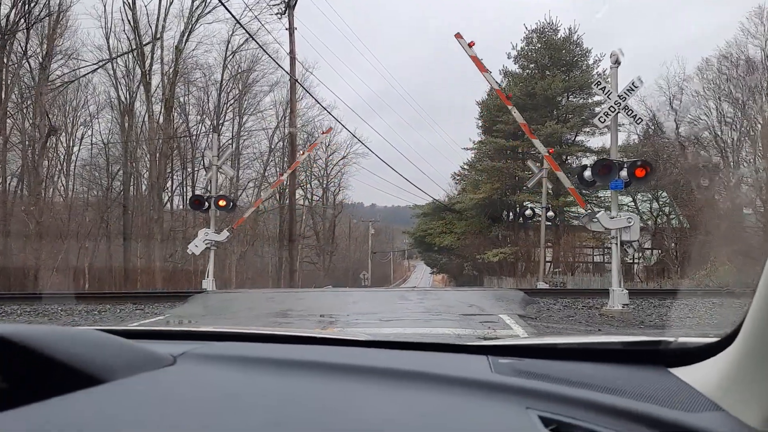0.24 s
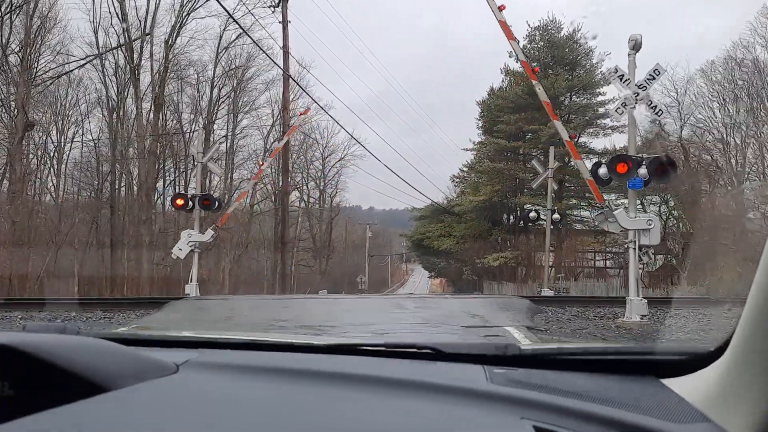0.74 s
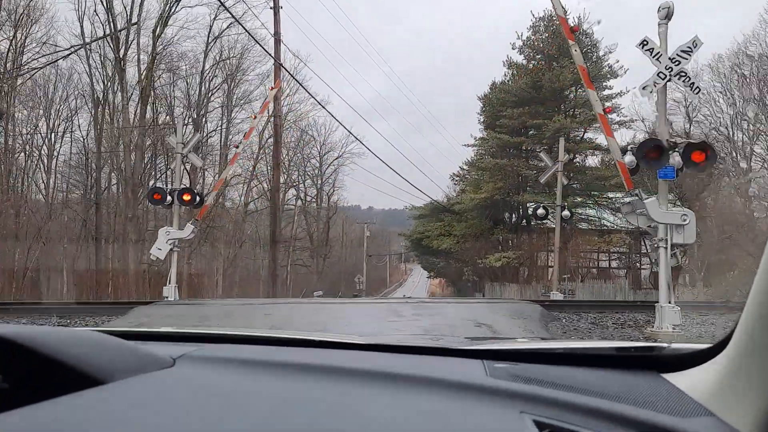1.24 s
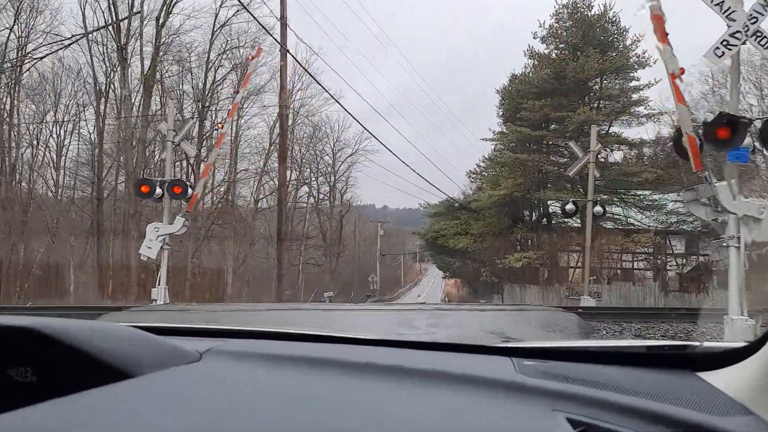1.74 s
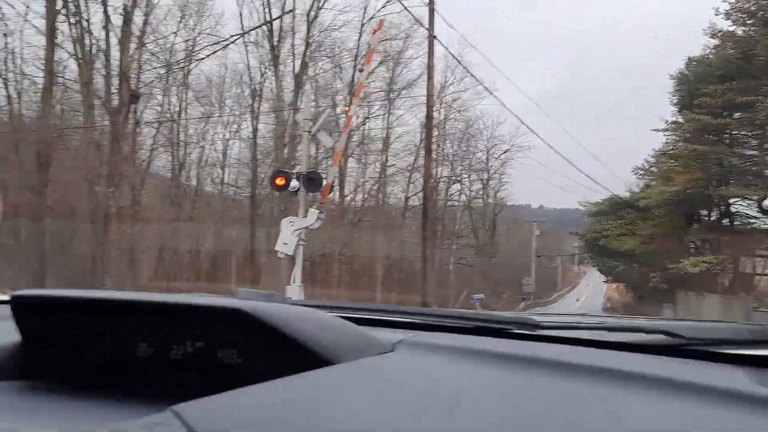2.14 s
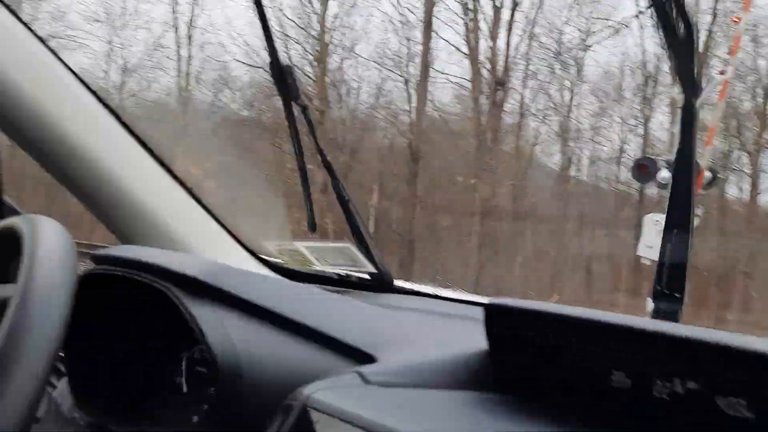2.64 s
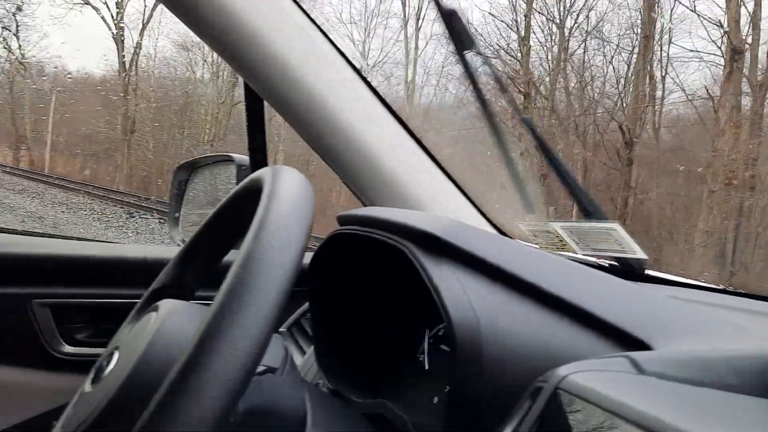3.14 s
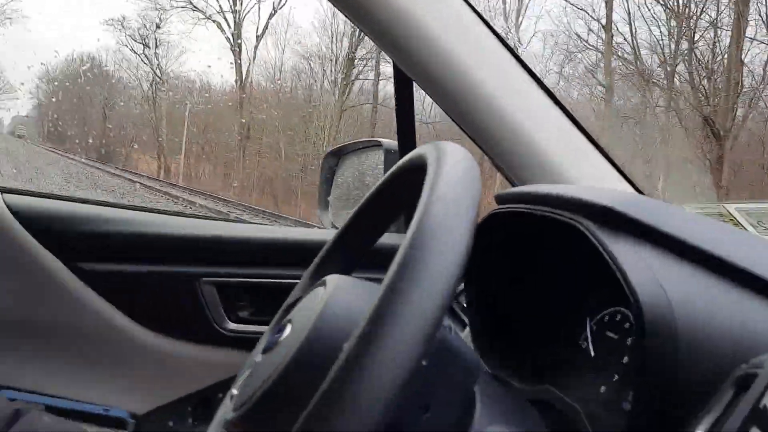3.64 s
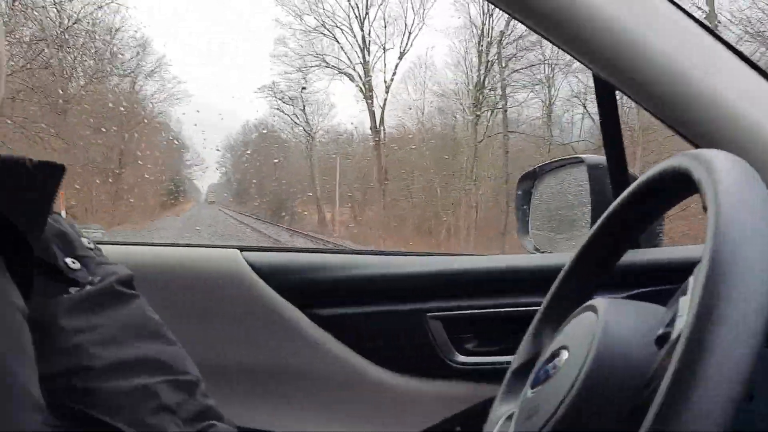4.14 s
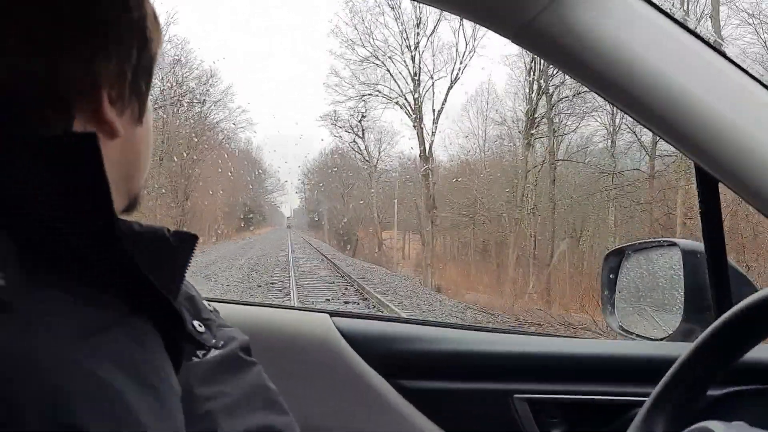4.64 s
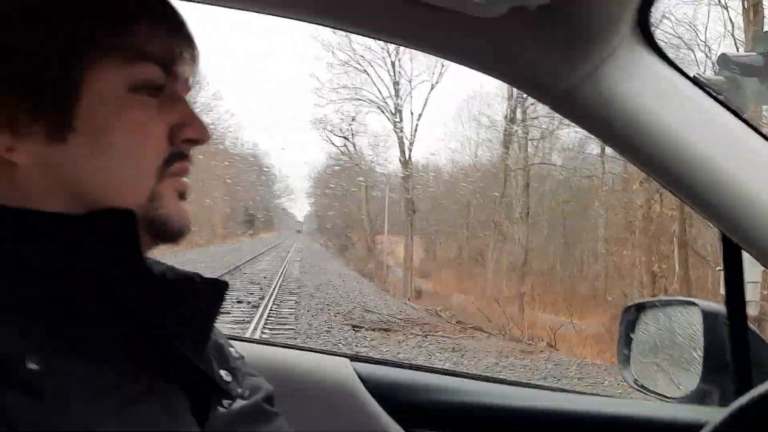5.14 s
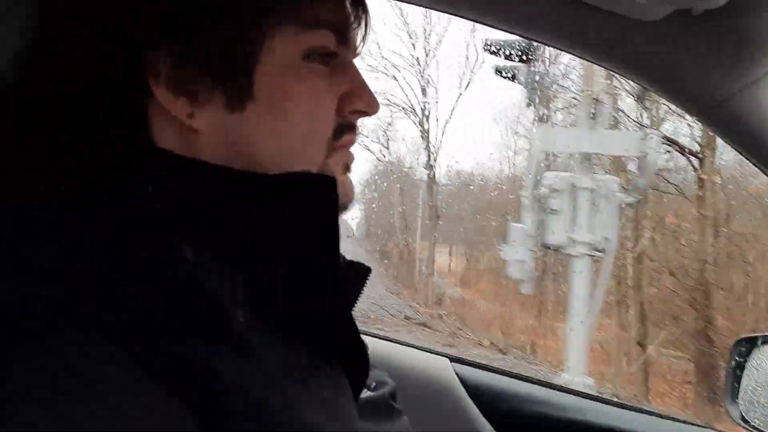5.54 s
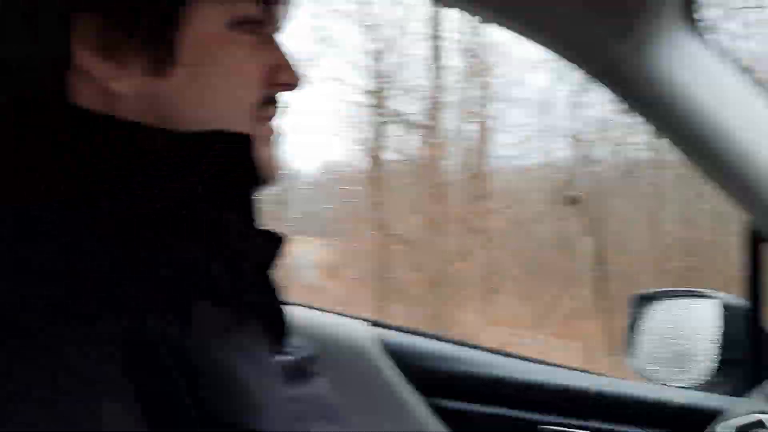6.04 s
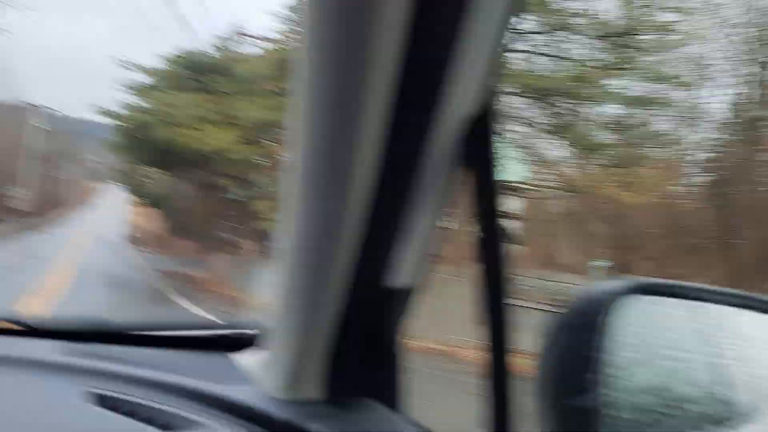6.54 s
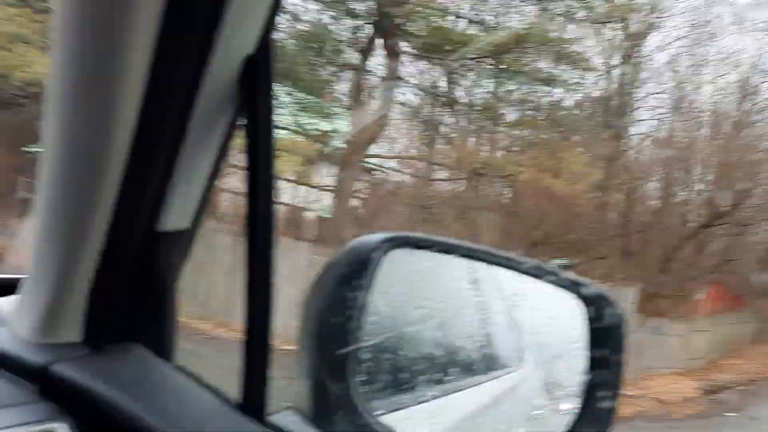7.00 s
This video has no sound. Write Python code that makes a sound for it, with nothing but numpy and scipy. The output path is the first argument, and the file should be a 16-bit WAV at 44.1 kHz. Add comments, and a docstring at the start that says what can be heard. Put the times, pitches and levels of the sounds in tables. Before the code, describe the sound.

Inside a car rolling slowly over a railroad crossing on wet road: low engine hum, rumble, bumps, tyre hiss, then buffeting wind on the left.

```python
"""Inside a car that rolls slowly over a railroad crossing on a wet road.
First an engine hum of steady firing orders over noisy road rumble and faint hiss, with short booms at the bumps.
A wiper swishes, a small motor whines, and the hiss of filtered noise grows; then plastic trim ticks.
From the middle, gusts of noise buffet the left microphone opening, with hollow pops and surges of airy hiss.
Near the end the hardest gusts thump, as ringing low tones on the left."""
import sys
import numpy as np
from scipy import signal
from scipy.fft import rfft, irfft
from scipy.io import wavfile
from scipy.ndimage import map_coordinates

SR = 44100
rng = np.random.default_rng(int(sys.argv[2]) if len(sys.argv) > 2 else 0)


def to_wav(sig):
    """Store sig (one row per channel, or 1-D mono) as 16-bit WAV at the path in sys.argv[1].

    Samples outside -1..1 are clipped; the rate is SR.
    """
    pcm = np.clip(np.atleast_2d(sig), -1, 1) * 32767
    pcm = np.round(pcm).astype(np.int16)
    wavfile.write(sys.argv[1], SR, pcm.T)  # frames by channels


N = 320537
TIME = np.arange(N) / SR  # seconds
HZ = np.fft.rfftfreq(N, 1 / SR)


def gain_of(db):
    """Turns decibels into an amplitude factor."""
    return 10 ** (np.asarray(db) / 20)


def evened(x):
    """Scales to an rms of 1."""
    return x / np.sqrt(np.mean(x ** 2) + 1e-20)


def read_spectrum(points):
    """Reads a table of pitches and values along the whole frequency axis."""
    hz, value = np.transpose(points)
    return np.interp(np.log(HZ + 1), np.log(hz), value)


def follow(rows):
    """Draws straight lines through each column of a time table."""
    s, *columns = np.transpose(rows)
    return [np.interp(TIME, s, column) for column in columns]


def drift(rate_hz):
    """Random wandering with an rms of 1, mostly slower than the given rate."""
    slowed = rfft(rng.standard_normal(N)) / (1 + (HZ / rate_hz) ** 4)
    return evened(irfft(slowed, N))


def swell(s, length, squareness=2, skew=0):
    """A bell at least half as strong in power for the given length; positive skew rises faster than it falls."""
    stretched = length * (1 + np.clip(skew, -.8, .8) * np.sign(TIME - s))
    distance = np.minimum(abs(2 * (TIME - s) / stretched), 10)
    return np.exp(-np.log(2) / 2 * distance ** squareness)


def noise(spectrum):
    """Coloured noise for one side, with an rms of 1."""
    return evened(irfft(rfft(rng.standard_normal(N)) * gain_of(read_spectrum(spectrum)), N))


# How alike noise in the cabin is on both sides: pitch_hz, likeness (0 to 1)
SIDE_LIKENESS = [(60, 0.93), (130, 0.93), (290, 0.82), (640, 0.49), (1300, 0), (16000, 0)]
# How cabin noise leans to one side: pitch_hz, left_minus_right_db
SIDE_LEAN = [(60, -0.5), (200, -2.5), (380, -2), (1290, -3), (2400, 1), (4400, 1.2), (6300, 1.5),
             (9500, 1.5), (13000, 2.5)]


def cabin_noise(spectrum):
    """Noise from all around: alike on both sides in the bass, unrelated in the treble; rms 1 on the right."""
    a, b = rfft(rng.standard_normal((2, N))) * gain_of(read_spectrum(spectrum))
    same = np.clip(read_spectrum(SIDE_LIKENESS), -1, 1)
    left = (same * a + np.sqrt(1 - same ** 2) * b) * gain_of(read_spectrum(SIDE_LEAN))
    pair = irfft(np.array([left, a]), N)
    return pair / pair[1].std()


def placed(x, lean_db):
    """Sets a sound to the left (above 0) or right (below 0)."""
    return x * gain_of([[lean_db / 2], [-lean_db / 2]])


def add(mix, s, sound):
    """Mixes a stereo sound in at time s."""
    part = mix[:, round(s * SR):][:, :sound.shape[1]]
    part += sound[:, :part.shape[1]]


def burst(spectrum, t60, tilt_db=0, size=8192):
    """A short burst of coloured noise that dies away, scattered differently to each side."""
    t, hz = np.arange(size) / SR, np.fft.rfftfreq(size, 1 / SR)
    colour_db = np.interp(hz, HZ, read_spectrum(spectrum)) + tilt_db * np.log2(hz + 200)
    scatter = evened(irfft(rfft(rng.standard_normal((2, size))) * gain_of(colour_db), size))
    return scatter * gain_of(-60 * t / t60) * (1 - np.exp(-t / 0.00071))


# The engine's course: start_s, firing_rate_hz, level_db
ENGINE_COURSE = [(0, 53.23, -34.5), (1.1, 50.5, -32.5), (2.3, 49.44, -33), (3.2, 40.08, -38.5),
                 (4, 40.02, -30.5), (5, 42.2, -38.5), (7.27, 39.25, -53)]
# Tones of the hum: multiple of the firing rate, strength_db before unsteadiness and fading
ENGINE_ORDERS = [(1, -2.5), (2, -1), (3, -6), (4, -17.5), (6, -16.5), (7, -17)]


def engine():
    """Low firing orders, each slightly unsteady; those above the second fade as the revs drop."""
    hz, db = follow(ENGINE_COURSE)
    turns = np.cumsum(hz * (1 + 0.01046 * drift(6.48))) / SR
    ease = np.clip((50 - hz) / 10, 0, 1)  # 0 at 50 Hz and above, 1 at 40 Hz and below
    hum = 0
    for multiple, order_db in ENGINE_ORDERS:
        size = gain_of(order_db - 4.9 * ease * (multiple > 2) + 2.0 * drift(15.0))
        hum = hum + size * np.sin(2 * np.pi * (multiple * turns + rng.random()))
    return placed(gain_of(db) * evened(hum), lean_db=-3.5)


# The road's course, before its lumps: start_s, rumble_db, tyre_roar_db
ROAD_COURSE = [(0, -35, -36), (1.2, -28.5, -37), (3.5, -32.5, -37.5), (6.4, -31, -37.5),
               (6.85, -29.5, -34.5), (7.27, -25.5, -31.5)]
# The rough deck of the crossing, one row: middle_s, length_s, rumble_db, tyre_roar_db
CROSSING_DECK = (5, 1.5, -31, -36)
# Colour of the shaken car body: pitch_hz, strength_db (per Hz)
RUMBLE_COLOUR = [(15, -36), (28, -41), (38, -6), (50, -2), (66, -2), (81, 3), (98, -3), (130, -3.5),
                 (160, -8), (210, -26.5), (300, -64), (600, -66.5)]
# Colour of the air in the tyres: pitch_hz, strength_db (per Hz)
ROAR_COLOUR = [(120, 1), (190, -3), (235, -3), (275, 0), (320, 2.5), (380, -1.5), (450, -7), (550, -11.5),
               (740, -18), (1000, -30.5), (1500, -24.5), (4000, -76)]


def road():
    """Rough asphalt shakes the body in uneven lumps and sets the air in the tyres roaring; the deck adds more."""
    rumble_db, roar_db = follow(ROAD_COURSE)
    s, length, deck_rumble_db, deck_roar_db = CROSSING_DECK
    deck = swell(s, length, squareness=24)
    lumps = drift(7)
    rumble = np.hypot(gain_of(rumble_db), gain_of(deck_rumble_db) * deck)
    rumble = rumble * gain_of(2.65 * lumps)
    roar = np.hypot(gain_of(roar_db), gain_of(deck_roar_db) * deck)
    roar = roar * gain_of(1.0 * lumps + 1.44 * drift(30))
    return rumble * cabin_noise(RUMBLE_COLOUR) + roar * cabin_noise(ROAR_COLOUR)


ECHO_NEAREST_S, ECHO_SPREAD_S, ECHO_SWAY_S = 0.000294, .003, .00012
SWAYS_PER_S = 0.197  # typical; each echo sways at half to one and a half times this
ECHO_SHARE = .11  # strength of each echo beside the direct sound


def echoes(x, count=4):
    """Near echoes from glass and dashboard; their paths sway slowly, so hollows wander through the hiss."""
    out = x
    for near, pace, phase in rng.random((count, 3)):
        sway = ECHO_SWAY_S * np.sin(2 * np.pi * (SWAYS_PER_S * (.5 + pace) * TIME + phase))
        delay = ECHO_NEAREST_S + ECHO_SPREAD_S * near ** 2 + sway
        out = out + ECHO_SHARE * map_coordinates(x, [np.arange(N) - delay * SR], order=2)
    return out / np.sqrt(1 + count * ECHO_SHARE ** 2)


# Resonances of the microphone opening (port): multiple of its main pitch, width_hz, strength_db
PORT_RESONANCES = [(.42, 500, -0.5), (1, 650, 1), (2.15, 2200, -5)]
PORT_HZ, PORT_SAG_HZ = 6360, 950  # main pitch in still air, and how far a typical gust lowers it


def port(x, flow, ring_db):
    """Adds the resonances of the microphone opening, which sink in pitch as the air flow grows."""
    turns = np.cumsum(PORT_HZ - PORT_SAG_HZ * flow ** 0.61) / SR
    ring = 0
    for multiple, width_hz, db in PORT_RESONANCES:
        turn = np.exp(2j * np.pi * multiple * turns)
        r = np.exp(-np.pi * width_hz / SR)
        # Shift the resonance down to 0 Hz, smooth there, and shift back up
        smooth = signal.lfilter([1 - r], [1, -r], x / turn)
        ring = ring + gain_of(db) * 2 * (turn * smooth).real
    return 0.68 * (x + gain_of(ring_db) * ring)


# Water under the tyres, before flicker: start_s, spray_db
WET_COURSE = [(0, -71.5), (.5, -63), (1.53, -61.5), (1.78, -47.5), (2.1, -47), (2.62, -43.5), (3.2, -50),
              (3.7, -46.5), (4.7, -48), (7.27, -49.5)]
# Brief surges of airy hiss on both sides: middle_s, length_s, fine_part_db (before its lean), dull_part_db
HISS_SURGES = [(5.34, 0.12, -45, -56), (6.41, 0.4, -42, -41)]
# The left opening is turned away from the spray, one row: middle_s, length_s, share_lost (0 to 1)
LEFT_SHELTER = (5.14, 0.76, 0.79)
# Colour of the dull wash: pitch_hz, strength_db (per Hz)
WASH_COLOUR = [(300, -12), (700, 3.5), (1100, 0), (1550, -0.5), (2200, -5), (2800, -11), (4000, -18.5),
               (6500, -26), (16000, -30)]
# Colour of the fine spray: pitch_hz, strength_db (per Hz)
SPRAY_COLOUR = [(900, -36), (2000, 7), (3000, -0.5), (3900, 2), (5000, -0.5), (6400, -1), (7500, -3.5),
                (9600, -7), (12000, -2.5), (14000, -7), (16000, -9)]
WASH_FLOOR_DB, WASH_OVER_SPRAY_DB = -52.5, -2  # the wash has a steady part and a part that follows the spray
SURGE_LEAN_DB = -6  # the fine part of the surges is stronger on the right


def wet_tyres_and_surges(flow):
    """A dull wash and fine spray, muffled while faint, that sings at the left opening; airy surges swell both."""
    spray_db, = follow(WET_COURSE)
    spray_size = gain_of(spray_db)
    wash_size = np.hypot(gain_of(WASH_FLOOR_DB), gain_of(spray_db + WASH_OVER_SPRAY_DB))
    for s, length, fine_db, dull_db in HISS_SURGES:
        surge = swell(s, length, squareness=2.6)
        spray_size = np.hypot(spray_size, placed(gain_of(fine_db) * surge, SURGE_LEAN_DB))
        wash_size = np.hypot(wash_size, gain_of(dull_db) * surge)
    wash = wash_size * gain_of(1.57 * drift(13.0)) * cabin_noise(WASH_COLOUR)
    spray = spray_size * gain_of(-0.47 + 0.99 * drift(30)) * cabin_noise(SPRAY_COLOUR)

    muffled = irfft(rfft(spray) / (1 + (HZ / 10500) ** 4), N)
    muffling = np.clip((-55.0 - spray_db) / 10, 0, 1)
    spray = spray + muffling * (1.13 * muffled - spray)

    s, length, share = LEFT_SHELTER
    kept = 1 - min(share, 1) * swell(s, length, squareness=3.1)
    left_spray = port(spray[0], flow, ring_db=-2.5) * kept
    return np.array([echoes(wash[0] + left_spray), echoes(wash[1] + spray[1])])


# Jolts of the body: middle_s, length_s (1.3 times the half-power length), pitch_hz, push_db
BUMP_JOLTS = [(0.194, 0.016, 85, -18), (.899, 0.05, 117.3, -18), (1.173, 0.0087, 99, -25.5),
              (1.625, 0.023, 99, -17), (1.727, .012, 131, -20), (1.77, 0.046, 129, -21.5),
              (2.152, 0.078, 78, -23), (2.314, .012, 100, -17), (2.343, 0.04, 103.4, -19.5),
              (2.42, 0.046, 81, -22.5), (3.049, 0.021, 90.5, -19.5), (3.156, 0.062, 58, -20),
              (3.318, 0.16, 80.3, -22.5), (3.743, 0.0074, 80.5, -14), (3.772, 0.038, 94, -16.5),
              (4.022, 0.1, 40, -25), (4.478, .014, 97, -20), (4.553, 0.029, 85, -19),
              (4.6, 0.16, 37, -26.5), (4.657, 0.0377, 129.4, -19), (4.872, 0.046, 97.5, -18.5),
              (4.984, 0.025, 60.3, -19.5), (5.064, 0.024, 76, -17), (5.089, .22, 43.8, -24.5),
              (5.127, 0.029, 92, -13.5), (5.452, 0.01, 90, -19), (5.49, 0.016, 106, -18.5),
              (5.895, .012, 75.6, -20.5), (6.607, 0.019, 114, -18.5), (6.951, 0.057, 79.5, -24)]
BUMP_SKEW = 0.38  # a bump comes faster than it goes
SHAKE_S, SHAKE_DB = 0.14, -14.5  # length of the shudder, and its level beside the push


def bumps():
    """Each joint or rail jolts the cabin into a few swings, with a dull tyre knock and a longer suspension shudder."""
    boom, force, shake_power = np.zeros((3, N))
    for s, length, hz, db in BUMP_JOLTS:
        push = gain_of(db) * swell(s, length / 1.3, skew=BUMP_SKEW)
        boom += push * np.sqrt(2) * np.cos(2 * np.pi * (hz * (TIME - s) + rng.random()))
        force += push
        shake_power += (gain_of(db + SHAKE_DB) * swell(s, SHAKE_S, skew=BUMP_SKEW)) ** 2
    knock = gain_of(-8.5) * cabin_noise(RUMBLE_COLOUR) + gain_of(-16.5) * cabin_noise(ROAR_COLOUR)
    shudder = np.sqrt(shake_power) * cabin_noise(RUMBLE_COLOUR)
    return placed(gain_of(-1.0) * boom, lean_db=-3.0) + force * knock + shudder


# A wiper blade on wet glass, one row: peak_s, length_s, level_db (before its lean)
WIPER_SWISH = (0.89, 0.13, -61)


def wiper():
    """Rubber sweeps a film of water aside: a hiss that builds up to the turn of the blade, then drops faster."""
    s, length, db = WIPER_SWISH
    sweep = gain_of(db) * swell(s, length, squareness=2.7, skew=-.6)
    return placed(sweep * cabin_noise(SPRAY_COLOUR), lean_db=7)


# A small motor runs briefly, one row: middle_s, length_s, pitch_hz (at the middle), level_db (before flutter)
MOTOR_RUN = (1.9, 0.8, 600, -51.0)
MOTOR_SAG_HZ_PER_S = 32.1


def motor():
    """A thin whine, one tone fluttering in pitch and level, that slowly sags."""
    s, length, hz, db = MOTOR_RUN
    pitch = hz - MOTOR_SAG_HZ_PER_S * (TIME - s)
    turns = np.cumsum(pitch * (1 + .018 * drift(38.3))) / SR
    level = gain_of(db + 2.5 * drift(20)) * swell(s, length, squareness=9.3)
    return placed(level * np.sin(2 * np.pi * turns), lean_db=-6.0)


# Trim ticks: start_s, level_db, t60_s (time to fall 60 dB), left_minus_right_db,
# brightness_db (per octave), ring_db (before a cut of 5.5 dB)
TRIM_TICKS = [(2.6854, -21, 0.054, 0, -2, -16), (4.2957, -29, 0.034, -3, 0, -7.5),
              (4.489, -28.5, 0.022, -2, 0.5, -24), (4.601, -37, .025, -7, -2, -14),
              (5.934, -36, .06, -2, 2, -14), (5.94, -31, 0.04, -2.5, 2, -3), (5.96, -36, 0.049, 0, 2, 0),
              (6.197, -26.5, .03, 0, 2, -8), (7.159, -31.5, .04, -6, 6, -6)]
# Colour of plastic trim: pitch_hz, strength_db (per Hz)
TRIM_COLOUR = [(300, -10), (1500, -13), (2400, -2), (3000, -5), (3650, 0.5), (3950, 7.5), (4300, 3),
               (4600, 1), (5000, 1), (5300, -3), (5700, 0.5), (6400, -4), (7700, -3.5), (9000, -3),
               (12000, -6.5), (16000, -7)]
# Tones of a small loose part: pitch_hz (before slight detuning), strength_db, t60_s
LOOSE_PART = [(2350, -7, 0.17), (3230, -7, 0.12), (4090, 2.5, 0.069), (5580, 6, 0.055), (6670, 2, 0.07),
              (8290, -5, 0.05), (11100, -3, 0.025), (14400, -6, .025)]


def ticks():
    """Short noise bursts of plastic trim set a loose part ringing, a little differently each time."""
    out = np.zeros((2, N))
    for s, db, t60, lean_db, tilt_db, ring_db in TRIM_TICKS:
        tick = burst(TRIM_COLOUR, t60, tilt_db)
        t = np.arange(tick.shape[1]) / SR
        detune = 1 + .003 * rng.standard_normal()
        ring = 0
        for hz, mode_db, decay in LOOSE_PART:
            phase = rng.random((2, 1))
            ring = ring + gain_of(mode_db - 60 * t / decay) * np.sin(2 * np.pi * (hz * detune * t + phase))
        ring = gain_of(ring_db - 5.5) * ring * (1 - np.exp(-t / 0.0012))
        add(out, s, placed(gain_of(db) * (tick + ring), lean_db))
    return out


# Gusts at the left opening: middle_s, length_s, strength_db,
# depth_db (above 0 a low buffet, below 0 a thin fizz)
GUST_LIST = [(3.59, 0.07, -64, -24), (3.72, 0.11, -48, 8), (3.834, .035, -42.5, 5), (4.03, 0.075, -38, -1),
             (4.173, 0.082, -31, 1), (4.3, 0.089, -37, 0.5), (4.451, 0.076, -34, -0.5),
             (4.703, .038, -34, 3), (4.765, 0.025, -39, 6.5), (4.914, 0.041, -31.5, 1.5),
             (5.058, 0.046, -29.5, -1), (5.205, 0.056, -32, 0.5), (5.338, 0.059, -33, -0.5),
             (5.493, 0.053, -32, -2.5), (5.66, 0.087, -46.5, -10), (5.836, 0.079, -45, -13.5),
             (6.1, 0.11, -48, -17), (6.21, 0.084, -30.5, -4.5), (6.293, 0.05, -29.5, 5.5),
             (6.422, 0.061, -26.5, 4), (6.532, 0.13, -33, 2.5), (6.633, 0.049, -41, -11.5),
             (7.116, 0.055, -33.5, -4), (7.222, 0.089, -30, -0.5)]
TYPICAL_GUST_DB = -31
BUFFET_GROWTH, BUFFET_PER_DEPTH = 1.85, 1.23  # big eddies grow fastest with strength and depth
SIZZLE_PER_THINNESS = 1.65  # the finest eddies belong to thin gusts


def gusts():
    """Strength of big eddies, air flow, small and finest eddies: 1 in a typical gust; deep gusts have more big ones."""
    power = np.zeros((4, N))
    for s, length, db, depth_db in GUST_LIST:
        over_db = db - TYPICAL_GUST_DB
        big_db = BUFFET_GROWTH * over_db + BUFFET_PER_DEPTH * depth_db
        finest_db = over_db - SIZZLE_PER_THINNESS * depth_db
        sizes = gain_of([big_db, over_db, over_db - depth_db, finest_db])
        power += (sizes[:, None] * swell(s, length, squareness=2.3)) ** 2
    return np.sqrt(power)


# Colours of the eddies from big to finest, each: pitch_hz, strength_db (per Hz)
BUFFET_COLOUR = [(25, -30), (70, -5), (140, -1), (240, -2), (335, 3), (400, -4), (520, -10.5), (740, -22),
                 (1000, -36), (2500, -59)]
FLUTTER_COLOUR = [(300, 6), (520, 2), (740, 4), (1000, -0.5), (1200, -1), (1550, 1), (1950, 1), (2400, -3),
                  (2900, -21), (4000, -13), (8000, -55)]
FIZZ_COLOUR = [(1000, -34), (2200, 0.5), (3100, 2.5), (4200, 4), (5500, 3), (6700, -2), (8000, -1),
               (9700, -7.5), (11000, -2.5), (12500, -2), (14500, -3.5), (16000, -6.5)]
SIZZLE_COLOUR = [(8500, -40), (10300, -14), (11500, -1), (12800, 0), (14500, -6), (16000, -9)]
# Levels in a typical gust, before flicker; the fizz also before the port
BUFFET_DB, FLUTTER_DB, FIZZ_DB, SIZZLE_DB = -25, -29.5, -40.5, -57.5


def draught(big, flow, small, finest):
    """Gusts cross the left opening: big eddies buffet, small ones flutter and fizz, the finest sizzle."""
    flicker = drift(200)
    air = big * noise(BUFFET_COLOUR) * gain_of(BUFFET_DB + 0.67 * flicker)
    air += flow * noise(FLUTTER_COLOUR) * gain_of(FLUTTER_DB + 1.9 * flicker)
    fizz = port(small * noise(FIZZ_COLOUR), flow, ring_db=4.5)
    air += fizz * gain_of(FIZZ_DB + 1.25 * flicker)
    air += finest * noise(SIZZLE_COLOUR) * gain_of(SIZZLE_DB)
    return np.array([air, np.zeros(N)])


# Hollow pops, mostly at the left opening: start_s, level_db, left_minus_right_db
AIR_POPS = [(3.628, -26.5, -1), (4.15, -31, 12), (4.879, -30.5, 19), (5.034, -26, 15), (5.279, -31, 13),
            (7.11, -29, 11), (7.192, -26.5, 13)]
# Colour of the hollow pops: pitch_hz, strength_db (per Hz)
POP_COLOUR = [(200, -7), (480, 3.5), (700, 5), (950, -9.5), (1600, -6), (2400, -48), (5000, -34)]


def pops():
    """Dull, hollow pops, mostly at the left opening as gusts strike it, each a short burst of coloured noise."""
    out = np.zeros((2, N))
    for s, db, lean_db in AIR_POPS:
        add(out, s, placed(gain_of(db) * burst(POP_COLOUR, t60=0.048), lean_db))
    return out


# Thumps at the left opening: start_s, level_db, brightness_db (per octave around the pivot)
GUST_THUMPS = [(6.297, -10, 8), (6.408, -9.5, -4.5), (6.433, -7, 4)]
# Low resonances of the opening: pitch_hz, strength_db (before brightness), t60_s
THUMP_TONES = [(109, -2, .09), (328.5, -0.5, 0.12), (470, -7, 0.045), (733, -20, 0.07)]
THUMP_PIVOT_HZ, THUMP_RISE_S = 330, .001


def thumps(size=16384):
    """The hardest gusts slam into the left opening and set its low resonances ringing."""
    out, t = np.zeros((2, N)), np.arange(size) / SR
    for s, db, tilt_db in GUST_THUMPS:
        ring = 0
        for hz, mode_db, t60 in THUMP_TONES:
            tone_db = mode_db + tilt_db * np.log2(hz / THUMP_PIVOT_HZ)
            ring = ring + gain_of(tone_db - 60 * t / t60) * np.sin(2 * np.pi * hz * t)
        thump = gain_of(db) * ring * (1 - np.exp(-t / THUMP_RISE_S))
        add(out, s, np.array([thump, 0 * t]))
    return out


def scene():
    """Adds all sources; the gusts' air flow also bends the ring of the spray."""
    big, flow, small, finest = gusts()
    driving = engine() + road() + wet_tyres_and_surges(flow) + bumps()
    fittings = wiper() + motor() + ticks()
    wind = draught(big, flow, small, finest) + pops() + thumps()
    return driving + fittings + wind


EDGE_HZ = 15950  # upper limit of the sound


def record(dry):
    """Rounds off peaks near full scale, then removes the highest treble."""
    rounded = dry / (1 + dry ** 6) ** (1 / 6)
    low_pass = signal.firwin(511, EDGE_HZ, window=("kaiser", 9), fs=SR)
    return signal.oaconvolve(rounded, low_pass[None], "same")


dry = scene()
out = record(dry)
to_wav(out)
```